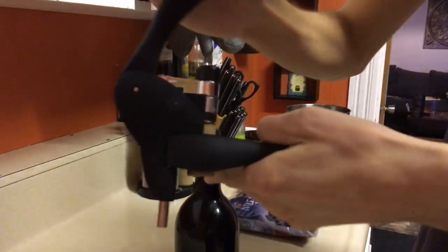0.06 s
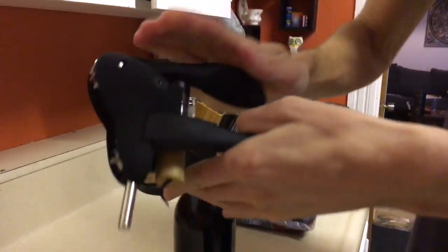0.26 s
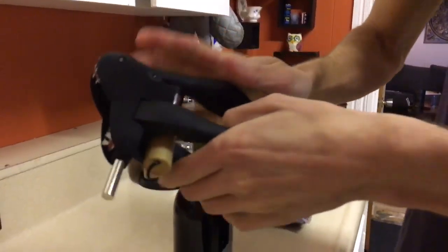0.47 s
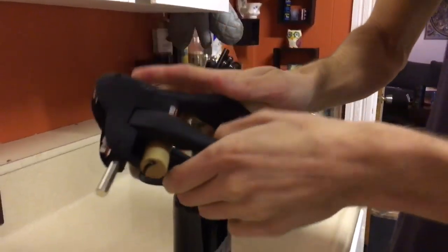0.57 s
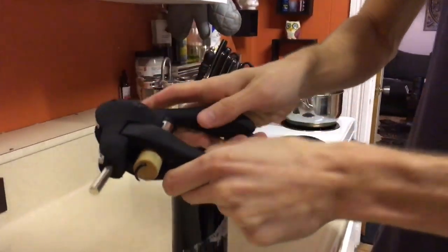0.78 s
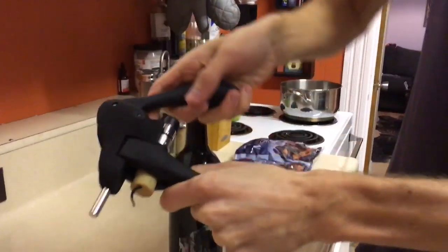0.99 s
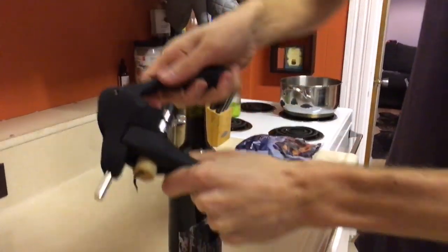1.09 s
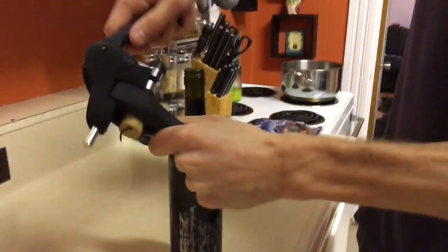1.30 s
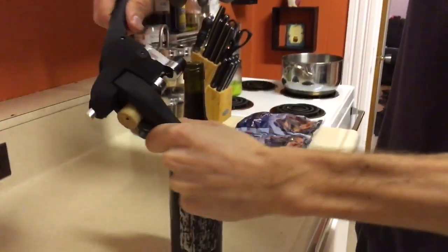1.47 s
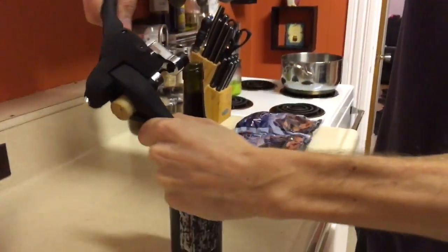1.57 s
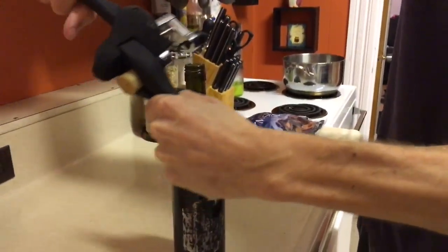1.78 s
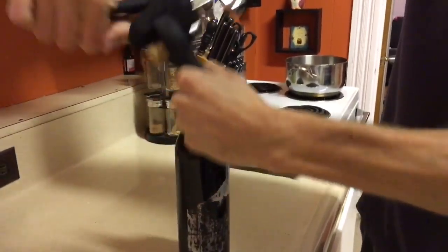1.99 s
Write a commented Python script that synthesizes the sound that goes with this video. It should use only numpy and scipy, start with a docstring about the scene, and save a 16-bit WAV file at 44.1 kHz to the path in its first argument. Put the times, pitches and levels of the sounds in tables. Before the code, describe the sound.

A loud clack from a lever corkscrew, followed by lighter metal clicks in a quiet kitchen.

```python
"""Lever corkscrew in a kitchen

Close by, a lever swings down, rattles and clacks against its stop; the clamp's metal parts click,
the steel spiral pings, and the rack judders and slides softly back. Each impact excites damped modes
and is dispersed as a bending wave; sliding friction hisses. Nearby surfaces mirror the hits,
the small kitchen reverberates briefly, and a refrigerator hums behind."""
import sys
import numpy as np
from scipy import signal
from scipy.fft import rfft, irfft, next_fast_len
from scipy.io import wavfile
from scipy.ndimage import uniform_filter1d

SR = 44100
rng = np.random.default_rng(int(sys.argv[2]) if len(sys.argv) > 2 else 0)


def dump_mix(stems):
    """Bounce the given channels to the path in sys.argv[1] as a 16-bit WAV at rate SR."""
    frames = np.atleast_2d(stems).T  # one column per channel
    limited = np.clip(frames, -1, 1)  # hard clip at full scale
    pcm = np.round(limited * 32767).astype(np.int16)
    wavfile.write(sys.argv[1], SR, pcm)


N = 90404

# bass, low-mid, mid, treble and air bands that shape a hit's timbre: (frequency [Hz])
BANDS_HZ = [550, 1500, 3400, 8000, 14000]
# rattle spectrum of the small metal parts: (frequency [Hz], relative density [dB])
METAL_RATTLE = [(200, -26.5), (750, -17), (1100, -8.5), (2600, 9.5), (4400, 6.5), (5200, 0), (7000, 2),
                (9500, -2), (10500, -12), (13500, -13), (16000, -35)]
METAL_RATTLE_T60_S, LIGHT_CONTACT_DB = .024, -16


def lever():
    """Impact excitation: every blow of the lever drives the same housing modes in a different balance."""
    # blows: (time [s], relative level [dB], gain in each of the five bands [dB], rattle [dB], contact [dB])
    blows = [(0.1634, -22, -7, 1.5, -2.5, -20, -11, -6.5, 1.5), (0.2112, -39, 5.5, 3, -6, -5, -13, -4, 7),
             (.2361, -12.5, 4, 6.5, 1, 2, -1, -5, -2), (.2396, -11, 0, 0, 1.5, 14.5, 10, -5, 5),
             (0.2419, -17.5, 13.5, 9, -10, -1.5, 6.5, 4.5, 7),
             (0.2443, -18.5, -4, -5, 4, 3.5, -5.5, -6.5, -7.5),
             (0.2491, -3.5, -7.5, 6.5, 6, 4.5, 1.5, -8.5, -8), (0.2527, -11, -6.5, 0, 3, 7.5, 2, 3, 6),
             (0.9031, -43, 16, 11, 13, 0, 1, 1, -16), (2.0386, -31, -1, 0.5, 1, -11, -19, 29, 4)]
    # housing modes: (frequency [Hz], relative energy [dB], T60 [s])
    modes = [(335, -22, .07), (505, -12.5, .07), (612, -8, .055), (895, -17, .1), (1250, -11, 0.035),
             (2080, -2, .018), (2390, 1, 0.022), (3190, 5.5, 0.0062), (1742, -1.5, .055), (3020, -15, .15),
             (3145, -19, .33), (3192, -20, .33), (3262, -11, .07), (3386, -14, .26), (3574, -9, .07),
             (4008, -13, .04), (4963, -21, .06), (5250, -20, .05), (7300, -18.5, .012),
             (9800, -17.5, 0.011)]
    # rattle spectrum of the housing's loose parts: (frequency [Hz], relative density [dB])
    rattle = [(120, -42), (280, -33), (560, -7), (820, -22.5), (1400, -7), (3200, -1), (4600, -6.5),
              (7500, -18.5), (9600, -13), (11000, -19), (16000, -23.5)]
    out = np.zeros(N)
    for s, db, *band_db, rattle_db, contact_db in blows:
        hit = strike(modes, rattle, rattle_db, contact_db, rattle_t60=0.029)
        add(out, s, undb(db) * colour(hit, list(zip(BANDS_HZ, band_db))))
    return out


def clamp():
    """Free vibration: pawl, catch and hinge snap over, each ringing at its own natural frequencies."""
    # clicks: (time [s], relative level [dB], five band gains [dB], rattle [dB], contact [dB], part)
    clicks = [(0.7894, -18.5, -30, -4.5, 3, 5, 10, -3.5, -18, "pawl"),
              (0.8511, -12.5, -7.5, 4, 0, 3, 5, -1.5, -0.5, "catch"),
              (0.8846, -32.5, 14, 9.5, 7.5, 3, 9, 1, -10, "catch"),
              (1.0035, -21, -16, 2, -8, 2, 5, -3, -7, "hinge")]
    # modes of each part: (frequency [Hz], relative energy [dB], T60 [s])
    modes = { "pawl": [(1340, 2.5, 0.028), (2114, 7, 0.022), (2940, -1, .015), (4040, -1.5, 0.012),
             (6350, -4, .009), (9150, -10, 0.012)], "catch": [(1117, -2, 0.027), (2640, 3, 0.062),
             (2980, -6, .08), (4080, -6, 0.2), (4354, 8, 0.022), (5910, 1.5, 0.035), (9180, 1, 0.037),
             (11440, -5, .015)], "hinge": [(1056, -8.5, 0.033), (1320, -9, 0.02), (2300, -2.5, 0.03),
             (2520, -7.5, 0.029), (4780, -11, 0.029), (8200, -13, 0.016), (8700, -7, 0.012),
             (9300, -10, 0.013)]}
    out = np.zeros(N)
    for s, db, *band_db, rattle_db, contact_db, part in clicks:
        hit = strike(modes[part], METAL_RATTLE, rattle_db, contact_db)
        add(out, s, undb(db) * colour(hit, list(zip(BANDS_HZ, band_db))))
    return out


def worm():
    """Resonance: light touches make the steel spiral ping faintly."""
    # touches: (time [s], relative level [dB], treble gain [dB])
    touches = [(.0254, -33.5, -7), (.0791, -38.5, 4), (1.379, -44, -6), (1.490, -42, -6), (2.0138, -42, -3)]
    # modes of the spiral: (frequency [Hz], relative energy [dB], T60 [s])
    modes = [(2034, -7, .05), (2896, -3, .055), (3380, -6, .06), (3736, 0, .13), (8800, -15, .04)]
    out = np.zeros(N)
    for s, db, treble_db in touches:
        ping = strike(modes, METAL_RATTLE, rattle_db=-14, contact_db=LIGHT_CONTACT_DB)
        add(out, s, undb(db) * colour(ping, [(BANDS_HZ[2], 0), (BANDS_HZ[3], treble_db)]))
    return out


def rack():
    """Stick-slip: as the lever is thrown back, uneven slips ring the rack, dying away as it runs free."""
    # rack modes: (frequency [Hz], relative energy [dB], T60 [s])
    modes = [(1580, 0, .04), (1830, -3, .04), (3000, -6, .04), (3900, -8, .02)]
    start_s, relative_db, slips_per_s = 1.657, -37, 800
    t = np.arange(SR // 3) / SR
    slipping = rng.random(len(t)) < slips_per_s / SR
    slips = slipping * rng.uniform(-1, 1, len(t)) * fade(t, t60=.4)
    ring = strike(modes, METAL_RATTLE, rattle_db=-2, contact_db=LIGHT_CONTACT_DB)
    out = np.zeros(N)
    add(out, start_s, undb(relative_db) * unit(signal.fftconvolve(slips, ring)))
    return out


def strike(modes, rattle_spectrum, rattle_db, contact_db, rattle_t60=METAL_RATTLE_T60_S):
    """Modal superposition: damped sinusoids sum with a dense rattle and a gritty contact in one hit."""
    radiation_hz = 230  # the small body radiates little below this
    t = np.arange(SR // 3) / SR
    ring = sum(undb(db) * unit(np.sin(2 * np.pi * hz * t) * fade(t, t60)) for hz, db, t60 in modes)
    rattle = colour(rng.choice([-1, 1], len(t)) * fade(t, rattle_t60), rattle_spectrum)
    contact = colour(rng.choice([-1, 1], len(t)) * fade(t, t60=.003), rattle_spectrum)
    hit = bend(unit(ring) + undb(rattle_db) * unit(rattle) + undb(contact_db) * unit(contact))
    taper = np.minimum(10 * (1 - t / t[-1]), 1)
    return unit(highpass(hit, radiation_hz) * taper)


def bend(x):
    """Dispersion: bending-wave speed grows with the root of frequency, so the treble arrives first."""
    delay_at_1khz_s = 0.0009
    khz = np.arange(len(x) // 2 + 1) * SR / len(x) / 1000
    lag_cycles = 2000 * np.sqrt(khz) * delay_at_1khz_s
    return irfft(rfft(x) * np.exp(-2j * np.pi * lag_cycles), len(x))


def friction():
    """Sliding friction: surfaces moving over each other give broadband noise with a grainy level."""
    # each rub has an envelope (time [s], level [dB]) and a spectrum (frequency [Hz], relative density [dB])
    plunge = [(.15, -66.5), (.19, -55.5), (.205, -48.5), (.235, -44.5), (.25, -69.5)]  # the plunger scrapes down ahead of the blow
    plunge_spectrum = [(300, -27), (1200, 6), (3200, 0), (5000, -6.5), (9000, -14.5), (16000, -20.5)]
    slide = [(0, -71), (.14, -72.5), (.45, -62), (.645, -64), (.67, -70), (.78, -70), (.81, -57.5),
             (.935, -53), (.96, -61), (1.1, -65.5), (1.2, -73), (1.33, -69), (1.49, -63), (1.64, -66.5),
             (1.67, -60), (1.73, -61.5), (1.85, -66.5), (1.95, -62.5), (2.05, -59)]  # soft hiss of the rack and hands
    slide_spectrum = [(500, -7.5), (1200, 6.5), (1650, 4.5), (2300, 0.5), (3400, 5), (6000, 0), (9000, -2),
                      (11000, -6.5), (16000, -8)]
    swing = [(1.64, -100), (1.68, -64), (1.735, -63.5), (1.77, -74), (1.85, -100)]  # brighter rub of the rack running free
    swing_spectrum = [(1000, -9.5), (3000, -9), (5800, 0.5), (9000, -7), (16000, -15)]
    grain_db, grain_hz = 1, 250
    rubs = [(plunge, plunge_spectrum), (slide, slide_spectrum), (swing, swing_spectrum)]
    return sum(noise(spectrum) * curve(levels) * undb(grain_db * walk(grain_hz))
               for levels, spectrum in rubs)


def kitchen(x):
    """Reverberation: direct sound, two early reflections and a diffuse tail that decays band by band."""
    # reflections from nearby surfaces: (delay [s], gain [dB])
    echoes = [(.0015, -13.5), (.0033, -17.5)]
    # diffuse tail: (frequency [Hz], gain [dB], T60 [s])
    tail = [(250, -9.5, .35), (691, -15, .3), (1150, -11, .33), (1900, -13.5, .29), (3200, -13, 0.44),
            (5590, -10, 0.33), (8800, -17, 0.28), (13000, -12, 0.23)]
    build_s = 0.0083
    t = np.arange(SR) / SR
    build_up = 1 - np.exp(-(t / build_s) ** 2)
    log_hz = np.log(np.arange(SR // 2 + 1) + 1)
    centres = np.log([row[0] for row in tail])
    spectrum = rfft(rng.standard_normal(len(t)))
    response = np.zeros(len(t))
    for share, (_, db, t60) in zip(np.eye(len(tail)), tail):
        band = irfft(spectrum * np.interp(log_hz, centres, share), len(t))
        response += undb(db) * band * unit(fade(t, t60) * build_up)
    response[0] += 1  # direct sound
    for s, db in echoes:
        response[int(s * SR)] += undb(db)
    return signal.fftconvolve(x, response)[:N]


def refrigerator():
    """Forced vibration: a motor hums, its lowest two tones beating, while a thin whine swells."""
    # motor tones: (frequency [Hz], level [dB])
    tones = [(50, -62), (59.2, -46.5), (118.4, -70.5), (236.9, -64.5), (403, -70), (414.5, -72),
             (468.3, -73), (592.2, -73.5), (942, -79.5), (1529, -72.5), (3176, -81), (4587, -84),
             (4730, -79.5)]
    # envelope of the whine: (time [s], level [dB])
    whine_levels = [(0, -80), (.6, -79), (.95, -78), (1.15, -73), (1.55, -72.5), (2.05, -73.5)]
    hum = sum(undb(db) * wavering(hz, drift=.001, rate_hz=6) for hz, db in tones)
    whine = curve(whine_levels) * wavering(hz=5400, drift=0.0012, rate_hz=91)
    return hum + whine


def room_air():
    """Ambient noise: a steady random floor, strongest in the bass."""
    # room air: (frequency [Hz], relative density [dB])
    spectrum = [(53, -33.5), (90, -4.5), (117, -9), (410, -13.5), (753, -23.5), (1570, -25), (2650, -44),
                (3080, -34), (4750, -48.5), (5530, -37), (6160, -44.5), (16000, -50)]
    return undb(-58) * highpass(noise(spectrum), hz=59.37)


def wavering(hz, drift, rate_hz):
    """Frequency modulation: a tone of rms 1 whose pitch wanders by about the fraction drift."""
    pitch_hz = hz * (1 + drift * walk(rate_hz))
    return np.sqrt(2) * np.sin(2 * np.pi * np.cumsum(pitch_hz) / SR)


def colour(x, points):
    """Minimum-phase filter through (frequency [Hz], gain [dB]) points."""
    size = next_fast_len(2 * len(x), real=True) // 2 * 2
    hz, db = np.array(points, float).T
    log_hz = np.log(np.arange(size // 2 + 1) * SR / size + 1)
    gain = undb(np.interp(log_hz, np.log(hz), db))
    cepstrum = irfft(np.log(gain))
    cepstrum[1:size // 2] *= 2  # folding onto positive time makes the filter causal
    cepstrum[size // 2 + 1:] = 0
    return irfft(rfft(x, size) * np.exp(rfft(cepstrum)))[:len(x)]


def highpass(x, hz):
    """Second-order roll-off below hz."""
    return signal.sosfilt(signal.butter(2, hz, "high", fs=SR, output="sos"), x)


def noise(spectrum):
    """Spectrally shaped noise of rms 1."""
    return unit(colour(rng.standard_normal(N), spectrum)) * np.sqrt(N)


def walk(rate_hz):
    """Low-passed noise: smooth random motion with a standard deviation of 1."""
    width = max(int(SR / rate_hz), 2)
    motion = uniform_filter1d(uniform_filter1d(rng.standard_normal(N), width), width)
    return motion / motion.std()


def curve(points):
    """Amplitude envelope through (time [s], level [dB]) points."""
    return undb(np.interp(np.arange(N) / SR, *np.array(points).T))


def fade(t, t60):
    """Exponential decay by 60 dB in t60 seconds."""
    return np.exp(-np.log(1000) * t / t60)


def undb(db):
    """Decibels to amplitude ratio."""
    return 10 ** (np.asarray(db) / 20)


def unit(x):
    """Normalisation to unit energy."""
    return x / np.sqrt(np.sum(x ** 2))


def add(out, s, x):
    """Superpose x on out, starting at s seconds."""
    start = max(int(s * SR), 0)
    out[start:start + len(x)] += x[:max(N - start, 0)]


def scene():
    """Superposition: close hits and their reverberation sum with friction, hum and air in one channel."""
    proximity_db = 10
    hits = undb(proximity_db) * kitchen(lever() + clamp() + worm() + rack())
    return (hits + friction() + refrigerator() + room_air())[None]


def record(dry):
    """Saturation and band limiting: peaks clip at full scale, then a steep low-pass cuts the top."""
    top_hz = 15700
    lowpass = signal.ellip(10, .2, 80, top_hz, fs=SR, output="sos")
    return signal.sosfilt(lowpass, np.clip(dry, -1, 1))


dry = scene()
out = record(dry)
dump_mix(out)
```